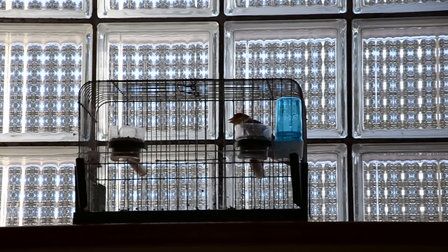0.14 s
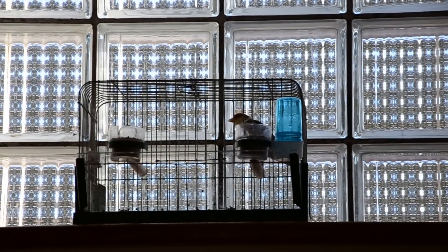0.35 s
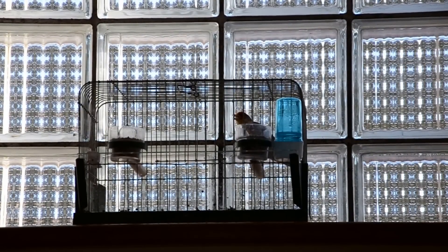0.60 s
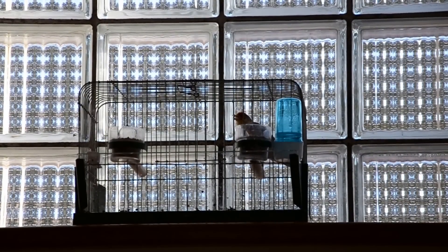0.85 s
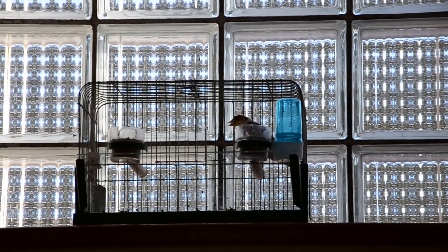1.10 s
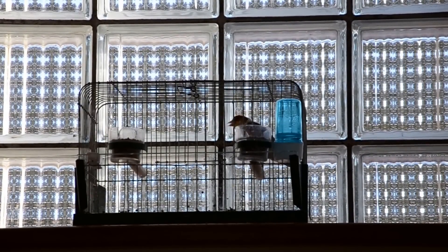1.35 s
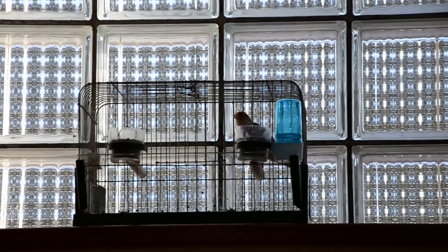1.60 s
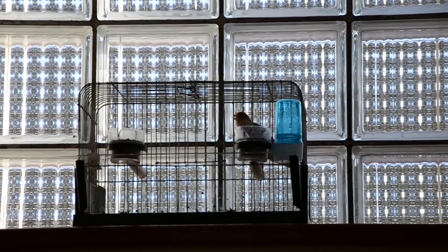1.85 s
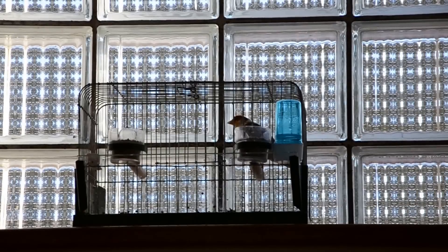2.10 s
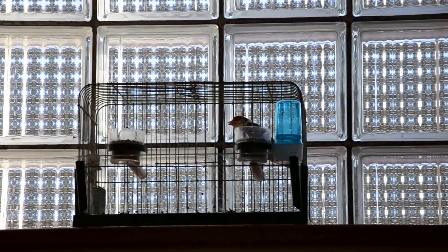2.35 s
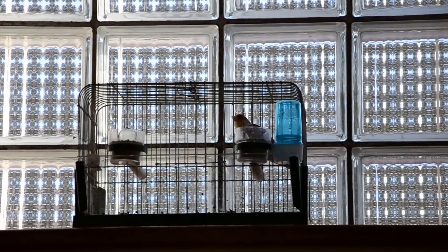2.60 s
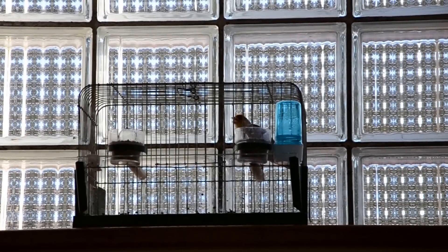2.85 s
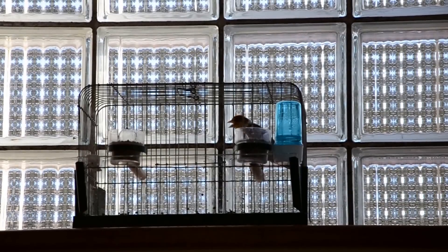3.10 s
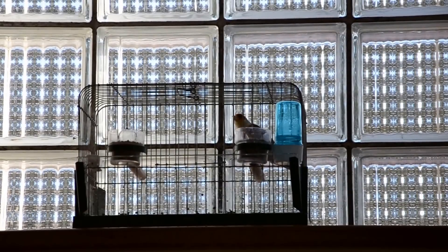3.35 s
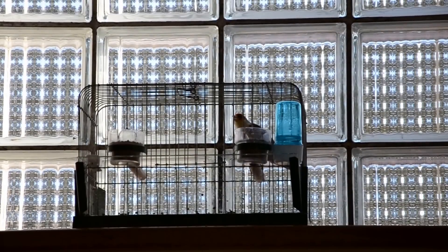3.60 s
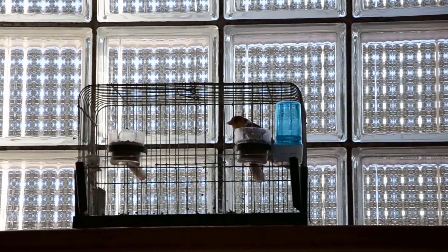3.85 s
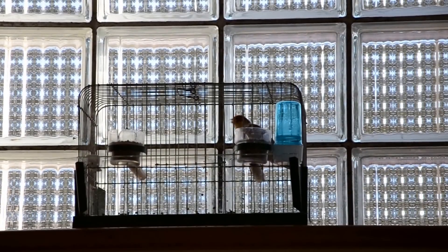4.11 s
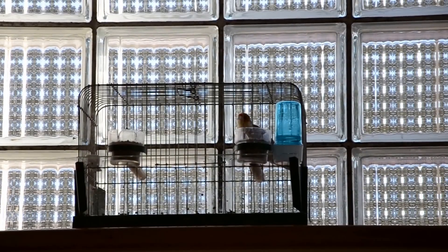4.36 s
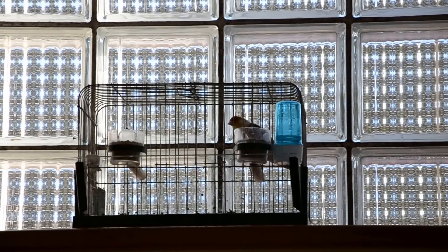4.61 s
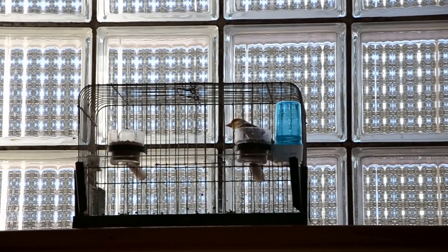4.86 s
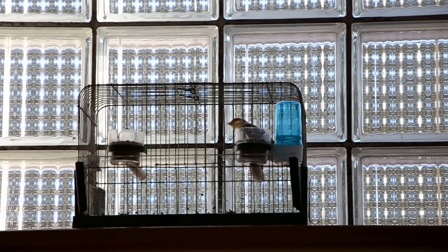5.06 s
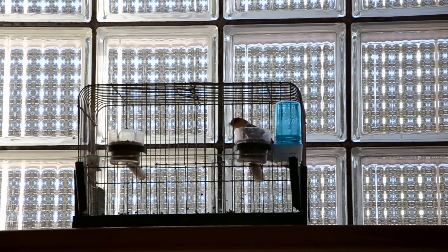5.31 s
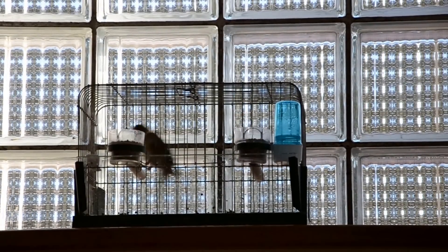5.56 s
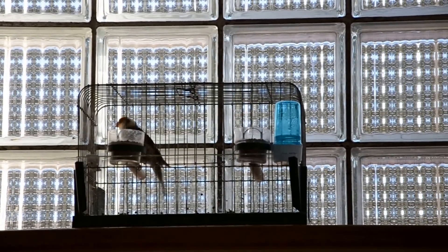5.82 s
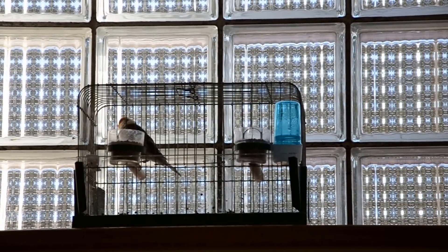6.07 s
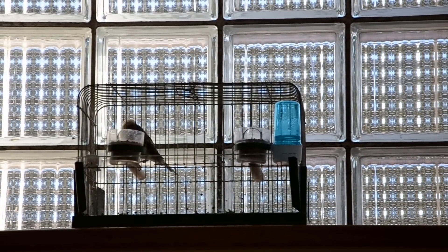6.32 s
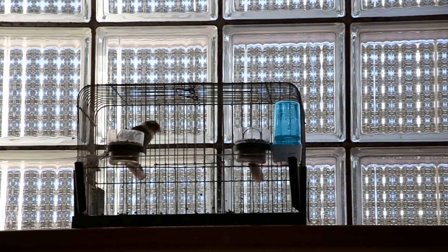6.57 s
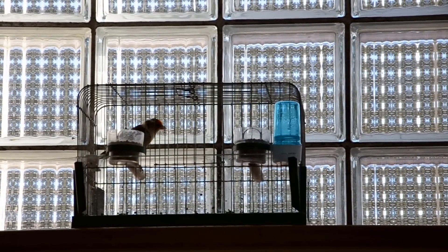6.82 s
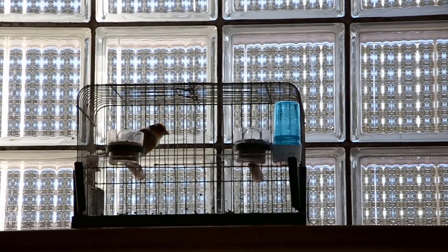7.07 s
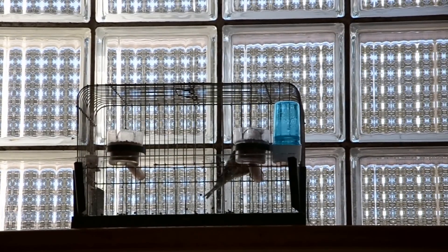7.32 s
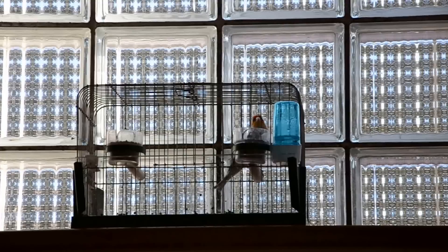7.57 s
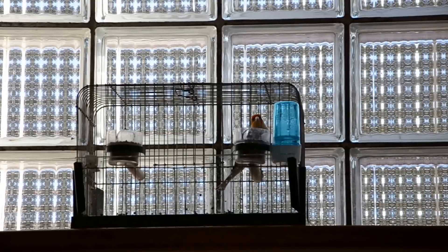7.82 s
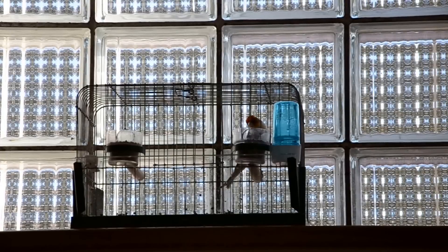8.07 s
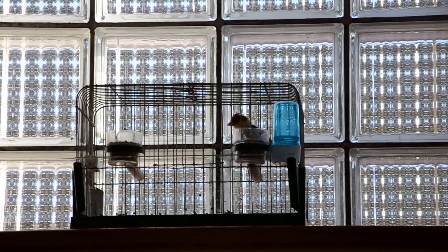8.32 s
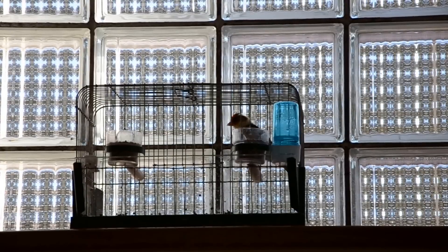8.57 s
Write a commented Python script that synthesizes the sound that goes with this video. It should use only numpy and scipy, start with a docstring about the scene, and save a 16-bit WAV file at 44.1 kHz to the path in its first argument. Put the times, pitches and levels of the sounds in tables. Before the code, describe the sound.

Bright finch song rings off hard walls for about four seconds, ending in a rough falling flourish, followed by faint far-off whistles and chirps.

```python
"""A caged finch, metres from the microphone in a hard, echoing room, starts amid a trill of short falls.
Buzzy chirps and single whistles follow, then rising chirps, two-voiced whistles and double ticks.
It ends on another trill and a rough falling flourish. Birds further off in the house go on softly:
whistles, chirps, a fast roll. Voices are gliding sines or buzzes, echoes are decaying noise;
far twitter, filtered-noise hiss and narrow-band hum lie under all."""
import sys
import numpy as np
from scipy import signal
from scipy.fft import rfft, irfft, next_fast_len
from scipy.io import wavfile
from scipy.ndimage import uniform_filter1d

SR = 44100
rng = np.random.default_rng(int(sys.argv[2]) if len(sys.argv) > 2 else 0)


def invert_db(level):
    """Linear amplitude ratio for a level in decibels (20 dB per decade), elementwise."""
    return 10 ** (np.asarray(level, dtype=float) / 20)


def master_out(mix):
    """Clip the mix to full scale and print it as 16-bit PCM to the path in sys.argv[1]."""
    frames = np.transpose(np.atleast_2d(mix))
    ceiling = np.clip(frames, -1, 1)
    pcm = np.round(ceiling * 32767).astype(np.int16)
    wavfile.write(sys.argv[1], SR, pcm)


N = 382788
LEAD = SR  # samples of run-in, so that sounds and echoes are under way at 0 s
# Bird levels are before distance gain, room and microphone.


def colour(sound, table):
    """Filter by (freq_hz, gain_db) points, interpolated over log frequency."""
    hz, db = np.transpose(table)
    size = next_fast_len(len(sound))
    freq_hz = np.arange(size // 2 + 1) * SR / size + 1  # +1 avoids log(0)
    gain = invert_db(np.interp(np.log(freq_hz), np.log(hz), db))
    return irfft(rfft(sound, size) * gain, size)[:len(sound)]


# hiss spectrum before the microphone: (freq_hz, density_db_per_hz)
HISS = [(30, -118), (60, -109), (125, -104), (250, -99), (500, -97), (1000, -99), (2000, -101),
        (4000, -109), (6500, -114), (9000, -118), (12000, -117)]
# hum tones before the microphone: (freq_hz, width_hz, level_db)
HUM = [(393.9, 7.2, -78.5), (445, 10, -86.5), (1165, 68, -78)]


def room_tone():
    """Smooth hiss plus hum tones that waver because each is a narrow band of noise."""
    tone_sum = colour(rng.standard_normal(N), HISS) * np.sqrt(SR / 2)
    for freq_hz, width_hz, level_db in HUM:
        b, a = signal.iirpeak(freq_hz, freq_hz / width_hz, fs=SR)
        hum = signal.lfilter(b, a, rng.standard_normal(N))
        tone_sum = tone_sum + invert_db(level_db) * hum / hum.std()
    return tone_sum


# reverberation time: (freq_hz, t60_s)
ROOM_T60 = [(500, 1.4), (2000, 1.18), (4000, 1.057), (6000, 0.77), (8000, 0.81), (12000, 0.81)]


def room(build_s):
    """Dense echoes of hard walls: build up, then decay at each band's own rate; unit energy."""
    t = np.arange(int(1.6 * SR)) / SR
    noise = rng.standard_normal(len(t))
    hz, t60_s = np.transpose(ROOM_T60)
    tail = 0
    for centre_hz in 1000 * 2 ** np.arange(0, 4, 1 / 3):
        edges_hz = centre_hz * 2 ** (np.array([-2, -1, 1, 2]) / 6)
        band = colour(noise, list(zip(edges_hz, (-80, 0, 0, -80))))
        tail = tail + band * invert_db(-60 * t / np.interp(centre_hz, hz, t60_s))
    tail = tail * (1 - np.exp(-t / build_s))
    return tail / np.sqrt(np.sum(tail ** 2))


def add(track, start_s, sound):
    """Mix a sound in at start_s."""
    part = track[LEAD + int(start_s * SR):][:len(sound)]
    part += sound[:len(part)]


def glide(length_s, start_hz, end_hz, bend, attack_s=0.0051):
    """Pitch sliding start to end, settling early if bend is large; soft start and stop."""
    t = np.arange(0, max(length_s, .004), 1 / SR)
    u = t / t[-1]
    rise = t / min(attack_s, 0.49 * length_s)
    fall = (1 - u) / 0.33
    swell = np.sin(np.pi / 2 * np.clip(np.minimum(rise, fall), 0, 1)) ** 2
    return end_hz + (start_hz - end_hz) * (1 - u) ** bend, swell


def whistle(hz, swell, level_db, octave_db):
    """Near-pure voice-box tone; its octave grows with loudness."""
    phase = 2 * np.pi * np.cumsum(hz) / SR
    tone = np.sin(phase) + invert_db(octave_db) * swell * np.sin(2 * phase)
    return np.sqrt(2) * invert_db(level_db) * swell * tone


def waver():
    """Half a second of voice-box unsteadiness: twice-smoothed noise, spread near 1."""
    smooth = uniform_filter1d(rng.standard_normal(SR // 2), size=150)
    return 14 * uniform_filter1d(smooth, size=150)


def notes(rows, rough):
    """Wavering whistles: a quick hook covers part of the interval, a slow slide the rest."""
    track = np.zeros(LEAD + N)
    for start_s, length_s, start_hz, end_hz, level_db, octave_db, hook in rows:
        interval_hz = start_hz - end_hz
        hz, swell = glide(length_s, end_hz + (1 - hook) * interval_hz, end_hz, bend=1, attack_s=0.0041)
        hz = hz + hook * interval_hz * np.exp(-np.arange(len(hz)) / SR / 0.00636)
        hz = hz * (1 + rough * waver()[:len(hz)])
        add(track, start_s, whistle(hz, swell, level_db, octave_db))
    return track


def trill(row, share, octave_db, bend, scatter):
    """One short gliding note repeated, with scattered pitch, level, timing and length."""
    first_s, period_s, last_s, start_hz, end_hz, level_db = row
    track = np.zeros(LEAD + N)
    chance = scatter * rng.standard_normal((64, 4))
    for start_s, (pitch, size, late, slow) in zip(np.arange(first_s, last_s, period_s), chance):
        hz, swell = glide(share * period_s * (1 + 0.039 * slow), start_hz, end_hz, bend)
        note = whistle(hz * (1 + .006 * pitch), swell, level_db + 0.47 * size, octave_db)
        add(track, start_s + 0.016 * period_s * late, note)
    return track


BUZZ_START_HZ, BUZZ_END_HZ, BUZZ_JITTER = 684, 796, .03  # jitter: spread, share of pitch
THROAT_WIDTH_HZ = 510


def chirps(rows, skirt_db):
    """Unsteady buzz of overtones 4 to 15; the throat lifts those near its resonance."""
    track = np.zeros(LEAD + N)
    order = np.arange(4, 16)[:, None]
    for start_s, length_s, level_db, throat_hz in rows:
        hz, swell = glide(length_s, BUZZ_START_HZ, BUZZ_END_HZ, bend=1.4)
        shake = 6 * uniform_filter1d(rng.standard_normal(SR // 2), size=36)
        hz = hz * (1 + BUZZ_JITTER * shake[:len(hz)])
        overtone_hz = order * hz
        skirt = invert_db(skirt_db) * np.minimum(1, throat_hz / overtone_hz) ** 2
        resonance = np.exp(-.5 * ((overtone_hz - throat_hz) / THROAT_WIDTH_HZ) ** 2)
        phase = order * 2 * np.pi * np.cumsum(hz) / SR + order ** 2
        buzz = ((skirt + resonance) * np.sin(phase)).sum(axis=0)
        add(track, start_s, invert_db(level_db) * swell * buzz)
    return track


# twitter loudness over time: (time_s, level_db)
TWITTER = [(.4, -48.5), (.8, -54), (2.3, -48.5), (3.8, -53), (5.5, -52), (6, -55), (6.25, -64), (7, -69),
           (7.4, -53), (7.9, -63), (8.1, -69)]
# twitter spectrum: (freq_hz, gain_db)
TWITTER_COLOUR = [(1700, -19.5), (2300, -3), (3000, -1.5), (4200, -2), (5200, -3), (6000, -7.5),
                  (7200, -9.5), (8500, -16.5), (10000, -16), (12000, -24.5)]


def twitter():
    """Quick wide slides at chance moments and pitches, too many to tell apart."""
    track = np.zeros(LEAD + N)
    for when, pitch, slide, size in rng.random((2500, 4)):
        start_s = when * (N / SR + 1) - 1
        mid_hz = 2700 + 7500 * pitch
        reach_hz = np.sign(slide - .5) * (500 + 1200 * size)
        hz, swell = glide(.012, mid_hz - reach_hz, mid_hz + reach_hz, bend=0.99)
        add(track, start_s, whistle(hz, swell, 0, -25.5))
    track = colour(track, TWITTER_COLOUR)
    time_s, level_db = np.transpose(TWITTER)
    return track / track.std() * invert_db(np.interp(np.arange(-LEAD, N) / SR, time_s, level_db))


# distant whistles: (start_s, length_s, start_hz, end_hz, level_db)
FAR_NOTES = [(3.54, .08, 1797, 1900, -68), (3.79, 0.09, 6560, 6550, -58.5),
             (4.305, 0.044, 5900, 5850, -45.5), (4.574, 0.047, 5800, 5750, -43.5),
             (4.659, 0.27, 3696, 3607, -47), (4.866, 0.23, 3270, 3450, -48.5),
             (4.891, 0.043, 5800, 5750, -43.5), (4.928, 0.24, 4355, 4450, -48),
             (5.101, 0.06, 3683, 3580, -43), (5.838, 0.039, 5950, 5880, -45.5),
             (5.94, 0.057, 1596, 1800, -67), (5.998, .2, 2020, 2480, -54), (6.14, 0.052, 4800, 4750, -49.5),
             (6.18, 0.14, 2425, 2620, -47.5), (6.6, 0.37, 2564, 2390, -66),
             (6.661, 0.32, 2875, 3050, -63.5), (6.929, 0.12, 3745, 3660, -55),
             (7.11, 0.041, 3600, 3620, -54.5), (7.183, 0.051, 6040, 5900, -47),
             (7.19, 0.036, 7300, 7250, -62), (7.33, 0.03, 4100, 4100, -49), (7.398, 0.049, 5250, 5500, -46),
             (7.648, 0.067, 5300, 5160, -55.5), (7.45, .17, 3500, 2600, -53),
             (7.579, 0.148, 2700, 2600, -58), (7.7, 0.26, 2412, 2330, -75), (7.798, 0.046, 7300, 6900, -54),
             (7.808, 0.056, 5500, 5500, -48.5), (8.15, 0.13, 2900, 3050, -64),
             (8.24, 0.073, 3700, 3680, -58.5), (8.44, 0.063, 3150, 3050, -59),
             (8.502, 0.084, 3650, 3600, -51), (8.55, 0.091, 2484, 2650, -64),
             (8.58, 0.039, 4700, 4650, -56), (8.633, .05, 3580, 4000, -45)]
# distant fast roll: (first_s, period_s, last_s, start_hz, end_hz, level_db)
FAR_ROLL = (5.185, .0216, 6.11, 4380, 3865, -38.5)
# distant buzzy chirps: (start_s, length_s, level_db, throat_hz)
FAR_CHIRPS = [(3.95, 0.056, -50.5, 6500), (4.54, 0.043, -53.5, 6000), (4.855, .04, -46, 5960),
              (5.19, .05, -45, 4950), (5.55, .04, -49, 5060), (5.81, 0.044, -46, 5700),
              (5.99, 0.033, -44.5, 5900), (6.368, .04, -44, 5370), (6.66, .3, -64, 2700),
              (6.68, 0.3, -59, 5400), (7.172, .04, -51.5, 5670), (7.395, .05, -52, 5150),
              (7.44, .16, -54, 3200), (7.655, 0.039, -49.5, 4900), (7.80, .04, -50, 5500),
              (8.14, .25, -61, 2700), (8.16, 0.17, -58, 5300), (8.5, .15, -58, 2900),
              (8.645, .04, -54, 4300)]
OCTAVE_DB, FAR_OCTAVE_DB = -40.5, -33.5  # octave of a plain whistle


def far_birds():
    """Distant voice boxes and throats: whistles, a roll, chirps and twitter."""
    rows = [(*row, FAR_OCTAVE_DB, .2) for row in FAR_NOTES]
    whistles = notes(rows, rough=.011)
    roll = trill(FAR_ROLL, 0.62, OCTAVE_DB, bend=4.0, scatter=.3)
    return whistles + roll + chirps(FAR_CHIRPS, skirt_db=-15) + twitter()


# The next four functions return rows for notes():
# (start_s, length_s, start_hz, end_hz, level_db, octave_db, hook as share of the interval)
PAIR_HOOK = 0.618
# single whistles, two held, then one short quick fall: (start_s, length_s, start_hz, end_hz, level_db)
SINGLES = [(.527, 0.098, 3894, 3990, -21), (.795, 0.16, 3897, 3945, -24.5),
           (1.19, 0.046, 3500, 2590, -31.5)]


def single_whistles():
    """One voice alone: two held whistles, then one short quick fall."""
    return [(*row, OCTAVE_DB, 0.276) for row in SINGLES]


# rising chirps: (start_s, start_hz, top_hz, level_db)
RISES = [(1.030, 2496, 3690, -22.5), (1.295, 2740, 3780, -22), (1.484, 2520, 3380, -27),
         (1.512, 3046, 3790, -22.5), (1.60, 3273, 3750, -25), (1.761, 2480, 3465, -26.5),
         (1.80, 2978, 3787, -22), (1.895, 3190, 3720, -25), (2.125, 2540, 3430, -22.5),
         (2.196, 3720, 4524, -21), (2.422, 2500, 3360, -23), (2.489, 3603, 4505, -18.5),
         (2.645, 2470, 3330, -23), (2.712, 3515, 4472, -19), (2.971, 2464, 3310, -24),
         (3.041, 3525, 4508, -19.5)]
RISE_S, RISE_OCTAVE_DB = 0.023, -36.5  # for a top of 3 kHz
RISE_S_PER_KHZ, RISE_OCTAVE_DB_PER_KHZ = 0.0059, 6


def rising_chirps():
    """Upward slides; the higher the top, the longer the chirp and the brighter its octave."""
    rows = []
    for start_s, start_hz, top_hz, level_db in RISES:
        above_khz = top_hz / 1000 - 3
        length_s = RISE_S + RISE_S_PER_KHZ * above_khz
        octave_db = RISE_OCTAVE_DB + RISE_OCTAVE_DB_PER_KHZ * above_khz
        rows.append((start_s, length_s, start_hz, top_hz, level_db, octave_db, 0.662))
    return rows


# two-voiced whistles: (start_s, upper_end_hz, lower_end_hz, upper_level_db, lower_level_db)
PAIRS = [(1.120, 5790, 4520, -33, -32), (1.378, 5650, 4560, -35.5, -31.5),
         (1.682, 6450, 5300, -32.5, -33.5), (2.062, 6500, 5330, -27, -31.5),
         (2.285, 6370, 5290, -24.5, -28), (2.582, 6340, 5160, -29, -30), (2.888, 6450, 5244, -28.5, -29.5),
         (4.10, 8140, 6090, -41, -38.5)]
PAIR_S, UPPER_FALL_HZ, LOWER_FALL_HZ, LOWER_OCTAVE_DB = 0.044, 170, 314, -16.5


def two_voiced_whistles():
    """Both halves of the voice box falling at once, each on its own pitch."""
    rows = []
    for start_s, upper_hz, lower_hz, upper_db, lower_db in PAIRS:
        rows.append((start_s, PAIR_S, upper_hz + UPPER_FALL_HZ, upper_hz, upper_db, OCTAVE_DB, PAIR_HOOK))
        rows.append((start_s, PAIR_S, lower_hz + LOWER_FALL_HZ, lower_hz, lower_db,
                     LOWER_OCTAVE_DB, PAIR_HOOK))
    return rows


# double ticks: (start_s, level_db)
DOUBLES = [(1.982, -33), (2.806, -29.5), (3.135, -30)]
# voices of a double tick: (delay_s, start_hz, end_hz)
DOUBLE_VOICES = [(0, 6370, 6080), (0, 7950, 7020), (0.024, 7950, 7120)]
DOUBLE_S = 0.033


def double_ticks():
    """Two high falls in succession over one lower whistle."""
    rows = []
    for start_s, level_db in DOUBLES:
        for delay_s, start_hz, end_hz in DOUBLE_VOICES:
            rows.append((start_s + delay_s, DOUBLE_S, start_hz, end_hz, level_db, OCTAVE_DB, PAIR_HOOK))
    return rows


# closing fall: (start_s, length_s, start_hz, end_hz, level_db, vibrato_depth_hz)
FLOURISH = (4.165, 0.1663, 5600.5, 2699.5, -21.5, 454)
VIBRATO_HZ = 90.2


def flourish():
    """Falling note whose vibrato is so fast that it sounds rough."""
    start_s, length_s, start_hz, end_hz, level_db, depth_hz = FLOURISH
    track = np.zeros(LEAD + N)
    hz, swell = glide(length_s, start_hz, end_hz, bend=1.8, attack_s=0.041)
    hz = hz + depth_hz * np.sin(2 * np.pi * VIBRATO_HZ * np.arange(len(hz)) / SR)
    add(track, start_s, whistle(hz, swell, level_db, -24.5))
    return track


# trills of falling notes: (first_s, period_s, last_s, start_hz, end_hz, level_db)
TRILLS = [(-.430, .0862, .45, 5300, 3900, -29.5), (-.387, .0862, .47, 3370, 1780, -29.5),
          (3.204, 0.06, 4.04, 5450, 3770, -32), (3.222, 0.084, 4.03, 3490, 2332, -24)]
# per trill: sounding share of the period
TRILL_SHARE = (0.27, .36, 0.27, .36)
# per trill: octave_db
TRILL_OCTAVE_DB = (-21.5, -21.5, -16.5, -41.5)
# per trill: bend; under 1 the note lingers high, then drops
TRILL_BEND = (1.3, .8, 1.09, 0.935)
# harsh chirps: (start_s, length_s, level_db, throat_hz)
NEAR_CHIRPS = [(.490, 0.044, -31.5, 6300), (.758, 0.053, -34.5, 6380), (.78, .04, -36.5, 3220)]
FINCH_DB = -4  # distance of the cage


def finch():
    """The song; the two voices load each other, and squaring them adds their sum tone."""
    rows = single_whistles() + two_voiced_whistles() + double_ticks() + rising_chirps()
    voices = notes(rows, rough=0.0054)
    sum_tone = invert_db(9) * colour(voices ** 2, [(9600, -63), (10100, 5.5), (12500, -1)])
    trills = sum(trill(*settings, scatter=0.82)
                 for settings in zip(TRILLS, TRILL_SHARE, TRILL_OCTAVE_DB, TRILL_BEND))
    buzzes = chirps(NEAR_CHIRPS, skirt_db=-8)
    return invert_db(FINCH_DB) * (voices + sum_tone + trills + flourish() + buzzes)


NEAR_DIRECT_DB, FAR_DIRECT_DB = -5, -11
NEAR_BUILD_S, FAR_BUILD_S = 0.0083, 0.0031


def scene():
    """Every bird straight and through the room; the far ones are mostly echo."""
    near, far = finch(), far_birds()
    direct = invert_db(NEAR_DIRECT_DB) * near + invert_db(FAR_DIRECT_DB) * far
    near_echo = signal.fftconvolve(near, room(NEAR_BUILD_S))
    far_echo = signal.fftconvolve(far, room(FAR_BUILD_S))
    birds = direct + (near_echo + far_echo)[:LEAD + N]
    return (birds[LEAD:] + room_tone())[None]


# microphone response: (freq_hz, gain_db)
MICROPHONE = [(1500, 0.5), (6800, 0.5), (7400, -5), (8000, -3.5), (8900, -4.5), (10300, -6.5),
              (11200, -14.5), (12300, -44.5), (14000, -60)]


def microphone(sound):
    """Small microphone: a dip between 7 and 8 kHz and a dull top."""
    return colour(sound, MICROPHONE)


def top_cut(x):
    """Nothing passes above the cut-off."""
    return signal.sosfilt(signal.butter(12, 12190, fs=SR, output="sos"), x)


def record(dry):
    """Pick the scene up with the microphone and finish the mix."""
    mix = microphone(dry.ravel())[None]
    return top_cut(mix)


dry = scene()
out = record(dry)
master_out(out)
```